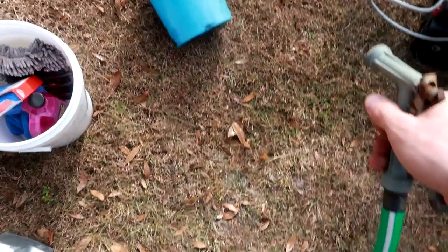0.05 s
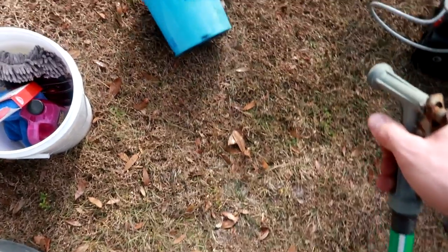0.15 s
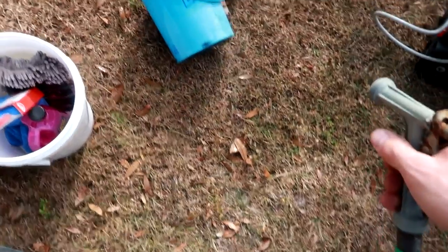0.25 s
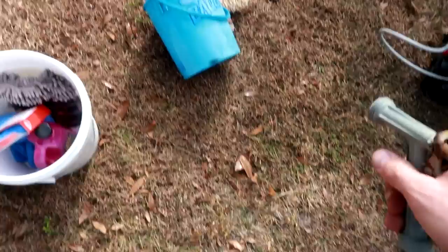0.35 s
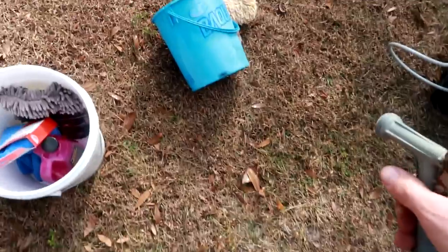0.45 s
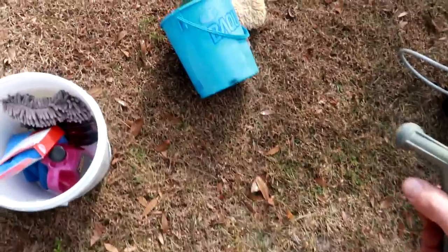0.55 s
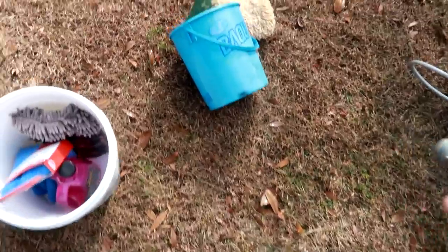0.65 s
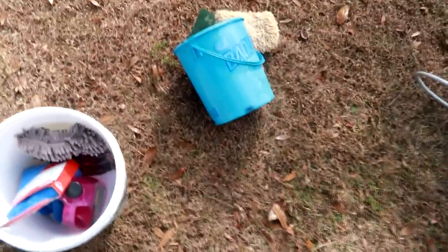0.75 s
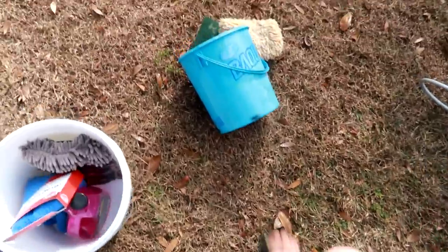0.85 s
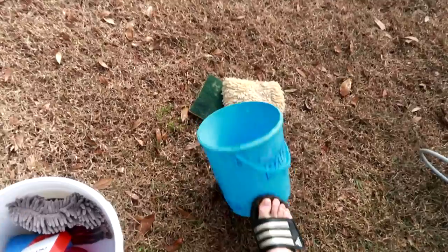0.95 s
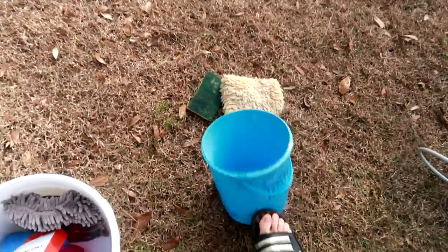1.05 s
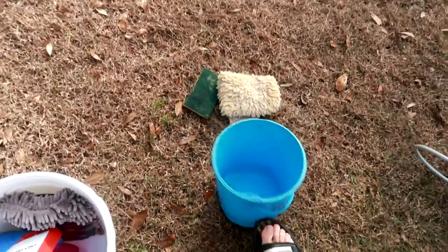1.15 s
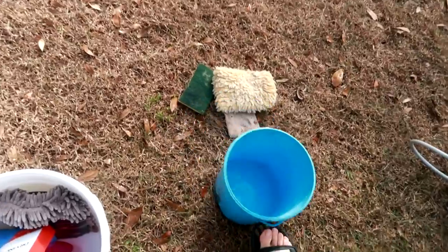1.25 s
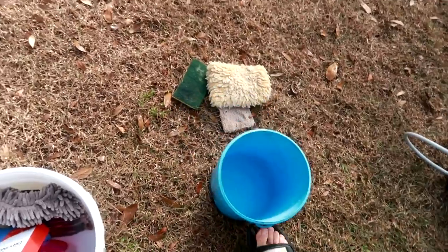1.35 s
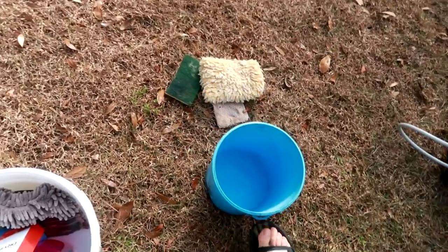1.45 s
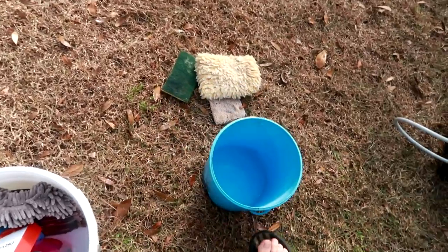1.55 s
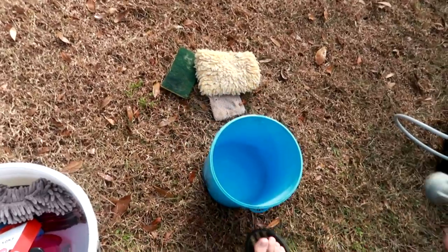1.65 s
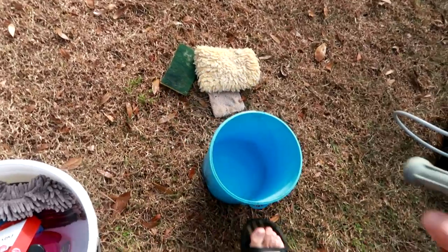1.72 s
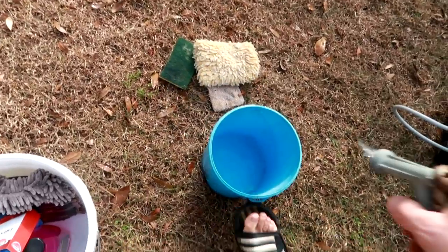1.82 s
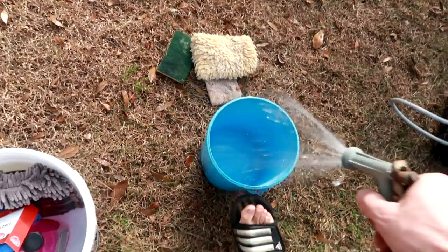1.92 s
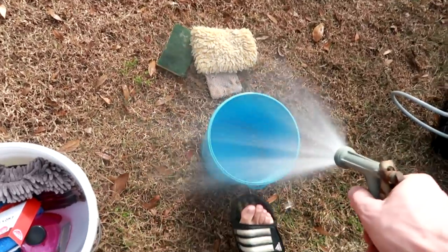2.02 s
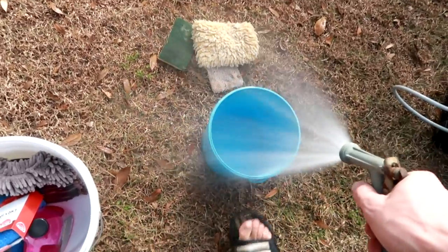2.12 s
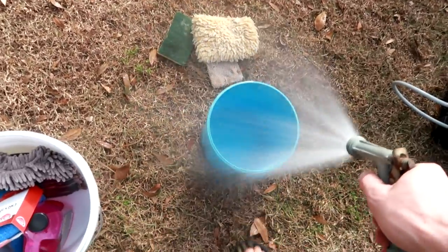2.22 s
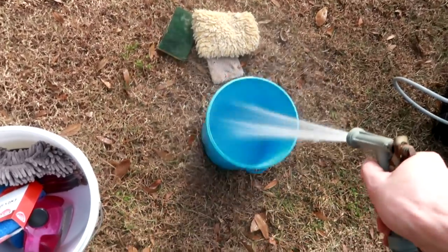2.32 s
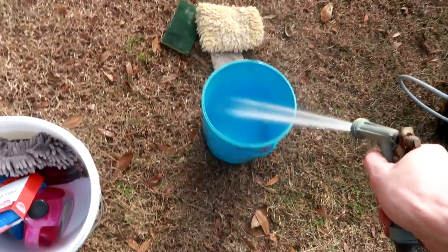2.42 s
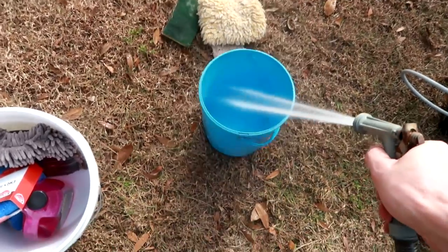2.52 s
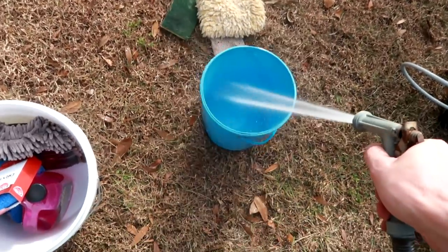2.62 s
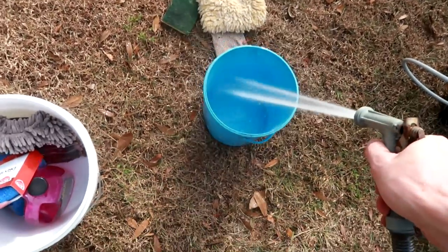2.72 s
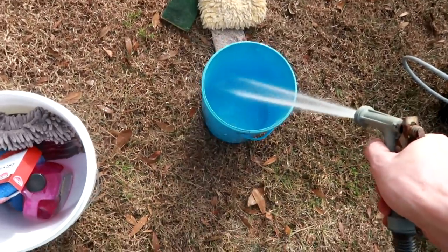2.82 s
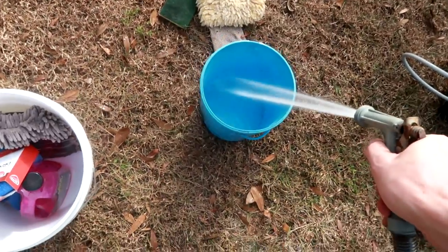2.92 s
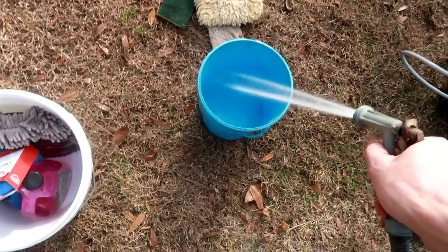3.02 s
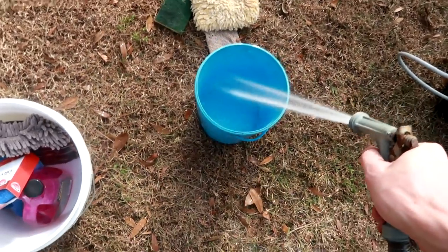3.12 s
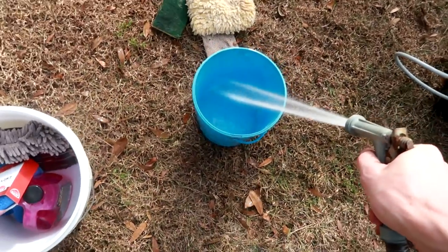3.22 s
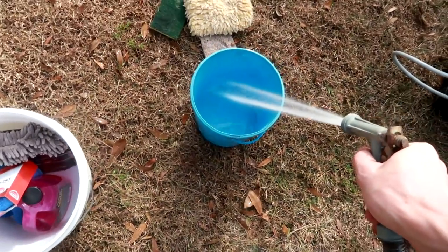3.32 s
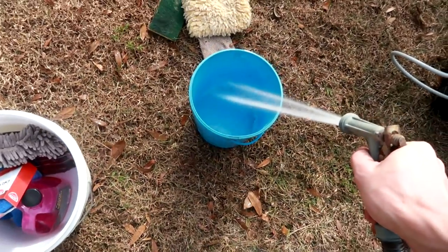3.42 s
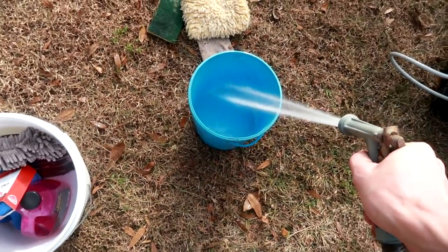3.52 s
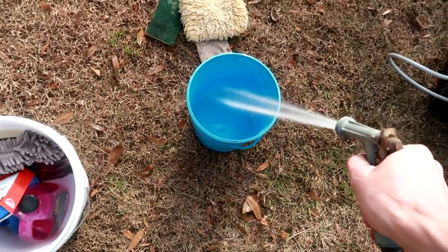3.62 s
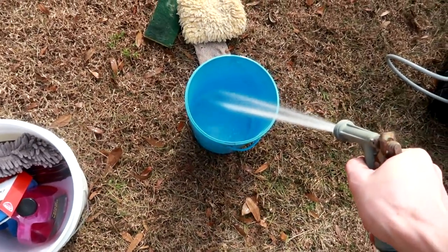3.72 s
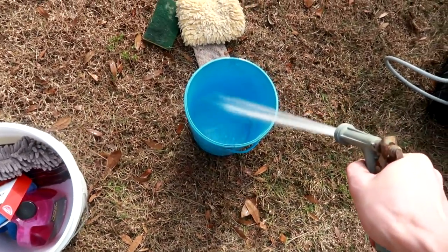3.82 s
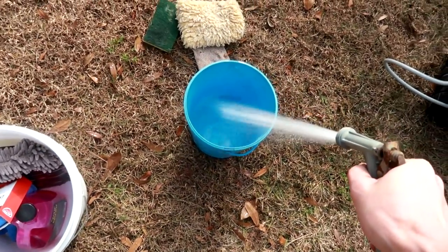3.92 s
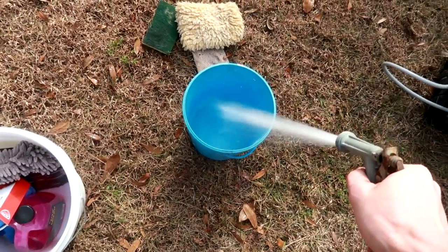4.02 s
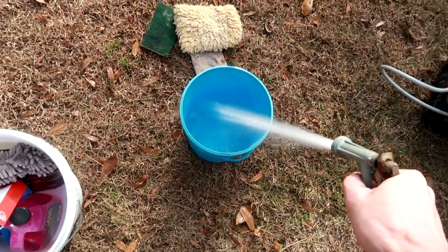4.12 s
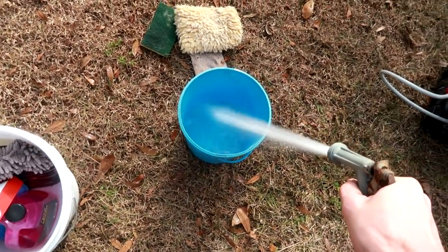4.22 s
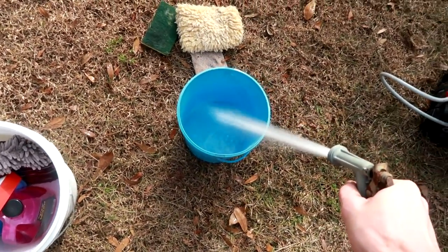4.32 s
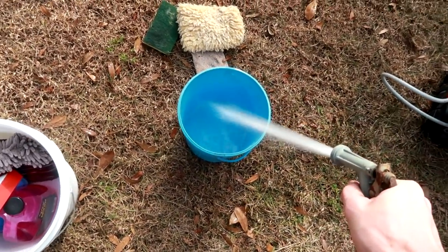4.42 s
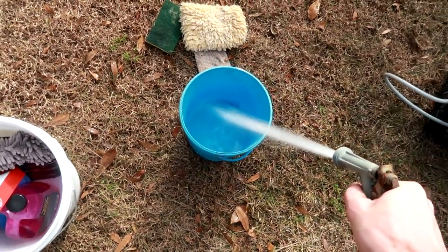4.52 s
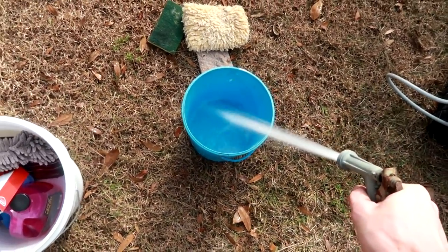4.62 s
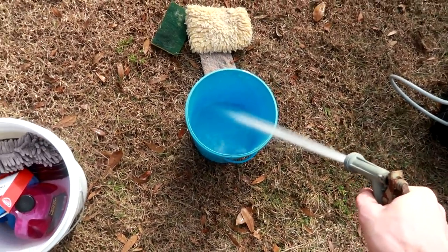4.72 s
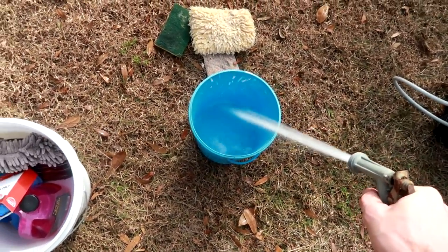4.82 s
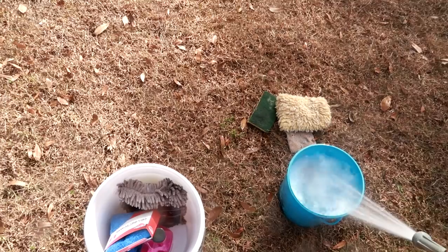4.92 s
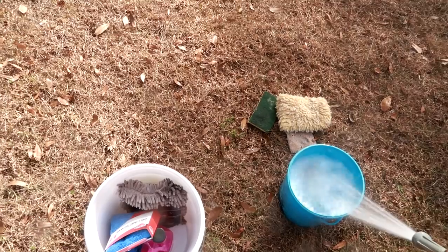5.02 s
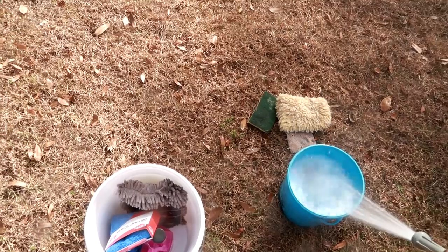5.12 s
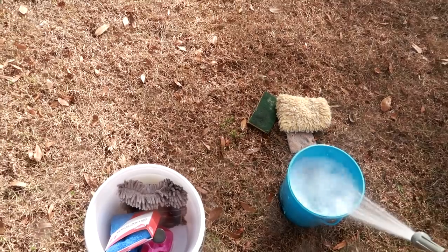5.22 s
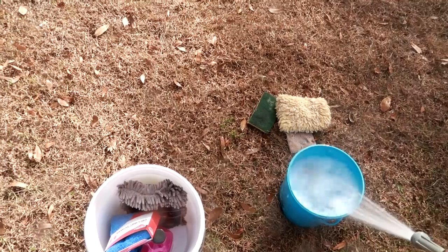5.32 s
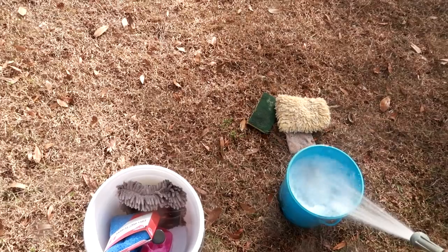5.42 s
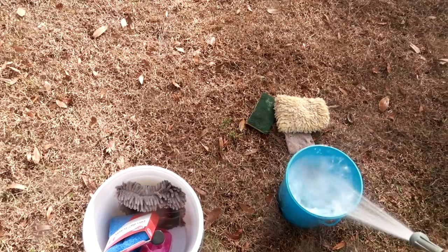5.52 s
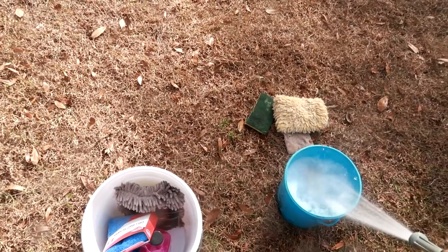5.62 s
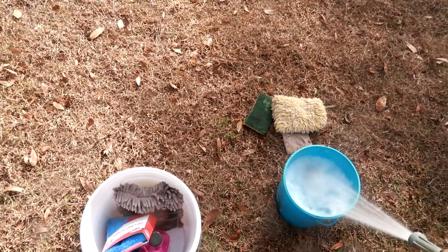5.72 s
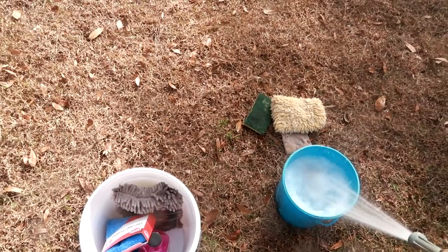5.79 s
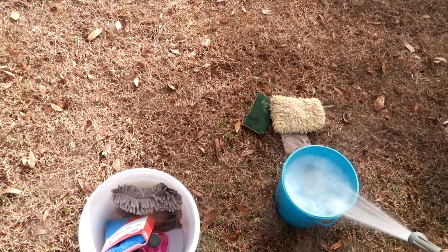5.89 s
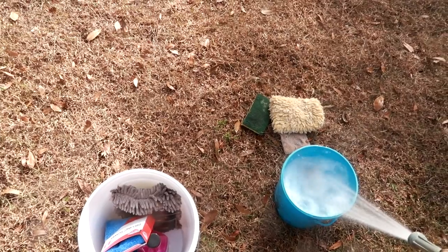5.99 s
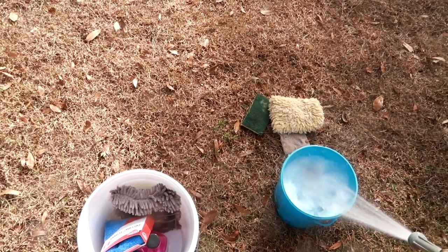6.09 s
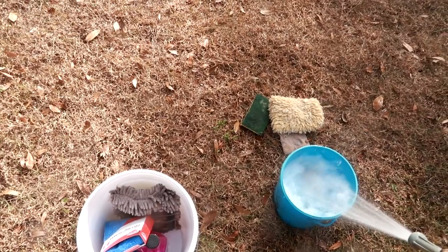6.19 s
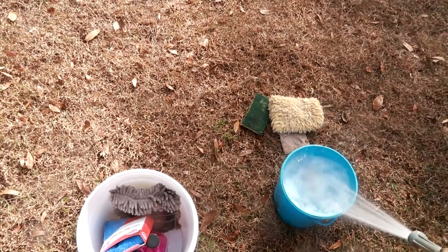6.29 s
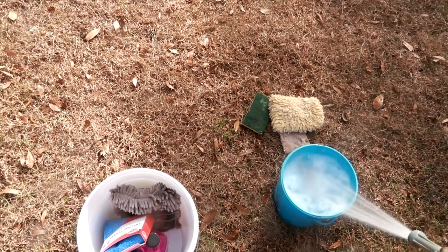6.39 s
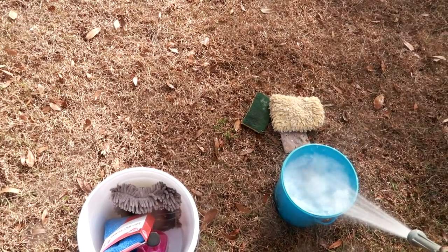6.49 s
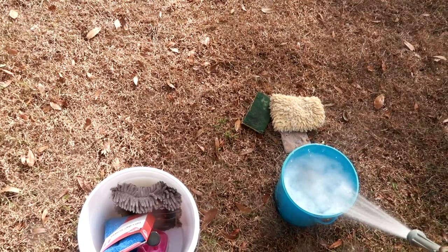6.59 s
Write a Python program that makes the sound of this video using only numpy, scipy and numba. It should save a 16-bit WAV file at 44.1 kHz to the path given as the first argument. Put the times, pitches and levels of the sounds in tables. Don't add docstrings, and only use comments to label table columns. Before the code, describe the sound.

A quiet yard murmur opens with leaf crunches, light hollow plastic taps and tiny dry insect ticks. After a lull, air hisses from a hose valve and spray patters on an empty bucket. It tightens into a loud jet, blasting the wall, ringing the air inside and thumping the base on turf. Suddenly the sound changes to even churning, gulping and fizzing in deep water, close and wide in stereo.

```python
import sys
import numpy as np
from scipy import signal
from scipy.fft import rfft, irfft
from scipy.io import wavfile
from scipy.ndimage import uniform_filter1d
from numba import njit

SR = 44100
rng = np.random.default_rng(int(sys.argv[2]) if len(sys.argv) > 2 else 0)


def materialize(psi):
    bounded = np.clip(np.atleast_2d(psi).T, -1, 1)
    quanta = np.round(bounded * 32767).astype(np.int16)
    wavfile.write(sys.argv[1], SR, quanta)


def ratio(d):
    e = np.asarray(d, float) / 20
    return 10 ** e


N = 293337
CUT_S = 4.938
HZ = np.fft.rfftfreq(N, 1 / SR) + 1e-3
TIME = np.arange(N) / SR


def rms_one(x):
    return x / np.sqrt(np.mean(x ** 2) + 1e-20)


def in_time(rows):
    s, level_db = np.transpose(rows)
    return ratio(np.interp(TIME, s, level_db, left=-140, right=-140))


def held(rows):
    s, hold, peak_db, rise, fall = np.transpose(rows)[:, :, None]
    before = np.maximum(s - TIME, 0) / np.abs(rise)
    after = np.maximum(TIME - s - hold, 0) / np.abs(fall)
    return np.sqrt(np.sum(ratio(peak_db - 20 * (before + after)) ** 2, axis=0))


def swells(rows):
    return held([(s, 0, *rest) for s, *rest in rows])


def bump_db(centre_s, height_db, half_s):
    return height_db * np.exp(-((TIME - centre_s) / half_s) ** 2)


def drift(rate_hz):
    spectrum = rfft(rng.standard_normal(N)) / (1 + (HZ / rate_hz) ** 2)
    return rms_one(irfft(spectrum * (HZ > .3), N))


def over_hz(points):
    hz, value = np.transpose(points)
    return np.interp(np.log(HZ), np.log(hz), value)


def resonances(modes):
    out = 1
    for hz, width_hz, level_db in modes:
        detune, g = hz ** 2 - HZ ** 2, ratio(level_db / 2)
        out = out * (detune + 1j * HZ * width_hz * g) / (detune + 1j * HZ * width_hz / g)
    return out


def band(low_hz, high_hz):
    b, a = signal.butter(3, [low_hz, high_hz], "band", analog=True)
    return signal.freqs(b, a, HZ)[1]


def part(spectra, low_hz, high_hz):
    x = irfft(spectra * band(low_hz, high_hz), N)
    return x / np.std(x.mean(0))


def later_part(spectra, low_hz, high_hz, shift_s=1):
    return np.roll(part(spectra, low_hz, high_hz), shift_s * SR, axis=1)


def strike(rows, response):
    s, level_db = np.transpose(rows)
    clicks = np.zeros(N)
    clicks[np.round(s * SR).astype(int)] = ratio(level_db)
    return irfft(rfft(clicks) * response, N) / np.abs(irfft(response, N)).max()


def ports(streams, alike, lead=((10, 0), (20, 0)), left=()):
    c = np.clip(over_hz(alike), 0, 1)
    skew = np.sqrt(np.abs(resonances(left))) * np.exp(.5j * over_hz(lead))
    mid, side = np.sqrt(1 + c) * streams[0], np.sqrt(1 - c) * streams[1]
    return np.array([(mid + side) * skew, (mid - side) / skew])


def air_noise():
    return rfft(rng.standard_normal((2, N)))


def droplets(per_s, spread_db, share):
    sizes = ratio(spread_db * np.minimum(rng.exponential(1, (2, N)), 5))
    sizes = sizes * rng.choice([-1, 1], (2, N))
    drops = sizes * (rng.random((2, N)) < per_s / SR) + 1e-18
    dealt = rng.integers(0, 10, (2, N))
    rings = 0
    for k, hz in enumerate(np.geomspace(350, 15000, 10)):
        r = np.exp(-np.pi * .45 * hz / SR)
        b = [(1 - r * r) / 2, 0, (r * r - 1) / 2]
        a = [1, -2 * r * np.cos(2 * np.pi * hz / SR), r * r]
        rings = rings + signal.lfilter(b, a, drops * (dealt == k))
    return rfft(np.sqrt(share) * rms_one(rings) + np.sqrt(1 - share) * rng.standard_normal((2, N)))


@njit
def moving_ring(x, cosine, r):
    y = np.zeros_like(x)
    for i in range(2, len(x)):
        y[i] = (1 - r * r) / 2 * (x[i] - x[i - 2]) + 2 * r * cosine[i] * y[i - 1] - r * r * y[i - 2]
    return y


def ring_out(x, centre_hz, width_hz):
    cosine, r = np.cos(2 * np.pi * centre_hz / SR), np.exp(-np.pi * width_hz / SR)
    return np.array([moving_ring(channel, cosine, r) for channel in x])


def emphasise(x, centre_hz, width_hz, level_db, steady=0.54):
    y = x + ratio(level_db) * ring_out(x, centre_hz, width_hz)
    power = uniform_filter1d(y.mean(0) ** 2 + 1e-9, size=SR // 25)
    y = y / power ** (steady / 2)
    return y / np.std(y.mean(0))


def yard_level():
    lull_db = bump_db(1.4, 1.5, .6)
    gust = swells([(2.44, -48, .8, .1)])
    late_s = np.maximum(TIME - 2.46, 0)
    duck_db = 9 * np.minimum(late_s / .08, 1) + 3 * late_s
    return np.hypot(ratio(-47 - lull_db - duck_db), gust) * (TIME < CUT_S)


def yard():
    # frequency in Hz, level in dB per Hz.
    murmur_tilt = [(15, -40), (25, -5.5), (118, -5), (231, -16), (293, -11), (383, -16), (588, -16),
                   (769, -20), (1000, -20.5), (1090, -22), (11200, -48), (13500, -52), (15000, -67)]
    # frequency in Hz, likeness.
    murmur_alike = [(60, 1.0), (130, 1), (290, 0.81), (640, 0.46), (1410, 0.29), (3100, 0.3), (6820, -0.34),
                    (15000, -0.052)]
    sound = ports(air_noise(), murmur_alike) * ratio(over_hz(murmur_tilt))
    murmur = yard_level() * ratio(2.5 + 1.0 * drift(5.7)) * part(sound, 32, 13000)
    whine = ratio(-82 + 4.5 * drift(40)) * np.sin(2 * np.pi * 13006 * TIME) * (TIME < 1.9)
    return murmur + whine * [[1.3], [.7]]


def leaves():
    # peak in seconds, level in dB, rise and fall in seconds per 20 dB, scuff re crackle in dB.
    footfalls = [(0.005, -50.5, .1, .1, -7), (.14, -70, .3, .3, 8), (.36, -68, .6, .11, 5),
                 (.51, -70, .14, .6, 2), (.7, -57, .18, .11, 5), (.832, -59.5, .2, .06, 1),
                 (.88, -73, .1, .5, 10), (1.2, -72, .07, .6, 9), (1.42, -76, .8, .04, 5),
                 (1.7, -83, 3, .6, 14), (1.9, -64, .05, .02, -1)]
    crackle = swells([row[:4] for row in footfalls])
    scuff = swells([(s, level_db + scuff_db, rise, fall) for s, level_db, rise, fall, scuff_db in footfalls])
    sound = ports(droplets(per_s=4500, spread_db=2.5, share=0.38), [(1000, 1.0), (8000, .3)])
    bright, dull = part(sound / np.sqrt(HZ), 2140, 10600), part(sound, 1170, 1970)
    return ratio(5.5) * crackle * bright + ratio(3.5) * scuff * dull


def knocks():
    # start in seconds, peak in dB.
    snaps = [
        (0.1552, -31),
        (0.1575, -36),
        (0.1615, -37),
        (0.1905, -41),
    ]
    # start in seconds, peak in dB, pitch in Hz, pan in dB, crack re ring in dB.
    blows = [(0.155, -31, 640, 3.5, -30), (0.16, -35, 614, 1.0, -30), (0.187, -43, 735, 1.5, -20),
             (0.509, -41, 670, -2.0, -10), (0.674, -37, 1310, 1.0, -7), (0.709, -34, 1420, 0.5, -10),
             (0.719, -32, 1430, 2.5, -10), (0.73, -39, 624, 3, -10), (0.756, -35, 1360, 0.0, -12),
             (0.798, -29, 2370, 0.5, -10), (0.805, -42, 507, -3, -10), (0.885, -40, 557, 1.0, -8),
             (1.258, -49, 622, 2.5, -10)]
    wire = resonances([(2850, 220, 17), (1800, 300, 8), (4100, 400, 8)])
    out = strike(snaps, band(1100, 11000) * wire)
    crack_colour = band(1500, 14000) * resonances([(2950, 200, 12), (7000, 600, 6)])
    for s, level_db, hz, pan_db, crack_db in blows:
        ring = strike([(s, level_db - 5.0)], band(0.86 * hz, 1.2 * hz) * resonances([(hz, 70, 14)]))
        crack = strike([(s, level_db + crack_db)], crack_colour)
        out = out + (ring + crack) * ratio(np.array([[pan_db / 2], [-pan_db / 2]]))
    return out


def insect():
    # start in seconds, peak in dB.
    ticks = [(.470, -31), (.503, -37), (.511, -29), (.569, -46), (.587, -40), (.637, -39), (.661, -45),
             (.704, -40), (.728, -40), (.770, -39), (.794, -44), (.836, -41), (.844, -46), (.860, -43),
             (.904, -39), (.931, -39), (.970, -45), (.988, -37)]
    sound = strike(ticks, band(3100, 4400) ** 2 * resonances([(4500, 300, 5), (3580, 250, 5.7)]))
    return sound * [[.72], [-1.15]]


def valve():
    # time in seconds, level in dB.
    spit = [
        (1.86, -83),
        (1.888, -63),
        (1.912, -64),
        (1.968, -41.5),
        (1.984, -48),
        (2.054, -54),
        (2.1, -45),
    ]
    # frequency in Hz, level in dB per Hz.
    spit_colour = [(2000, -20), (4000, -16), (6300, -7), (8000, -10), (10700, -2), (12500, -14),
                   (14000, -19), (15500, -41)]
    sound = ports(air_noise(), [(3000, 0.5), (12000, 0.37)]) * ratio(over_hz(spit_colour))
    return in_time(spit) * part(sound, 1500, 15000)


def jet_gains():
    # time in seconds, level in dB.
    glancing = [
        (2.05, -54),
        (2.128, -38),
        (2.236, -32.5),
        (2.4, -32),
        (2.44, -39),
        (2.67, -37),
        (2.74, -29),
        (3.3, -29),
        (4.93, -34.5),
    ]
    # time in seconds, level in dB.
    breakup = [
        (2.05, -55),
        (2.128, -35),
        (2.3, -32),
        (2.46, -28.5),
        (2.98, -28.5),
        (3.05, -31),
        (3.75, -31),
        (4.07, -38.5),
        (4.93, -38.5),
    ]
    # start in seconds, hold in seconds, level in dB, rise and fall in seconds per 20 dB.
    passes = [
        (2.468, .07, -21.5, .045, .07),
        (2.955, .11, -20, .13, .6),
        (3.2, .25, -26, .4, .6),
        (3.62, .3, -21, .6, .12),
        (3.96, .04, -20.5, .15, .3),
        (4.15, .08, -29, .3, .2),
        (4.445, .045, -19.5, .08, .11),
        (4.665, .17, -18.5, .12, .3),
        (4.9, .05, -21.5, .1, .1),
    ]
    # peak in seconds, level in dB, rise and fall in seconds per 20 dB.
    sputters = [(2.486, -26.5, .06, .08), (2.6, -30, .2, .05), (2.67, -30, .15, .1),
                (2.78, -25.5, .12, .15), (2.9, -28, .1, .25), (3.38, -30, .1, .5), (3.5, -29.5, .4, .5),
                (3.99, -36, .1, .2), (4.38, -35, .7, .3), (4.66, -32.5, .3, .25), (4.92, -33.5, .08, .1)]
    booms = [(2.2, -44, .2, 3), (2.468, -25, .06, .1), (2.56, -33, .05, .2), (2.666, -32, .12, .05),
             (2.76, -35, .07, .2), (2.93, -31, .09, .2), (3.032, -24.5, .2, .14), (3.376, -30, .09, .6),
             (3.58, -33, .4, .4), (3.71, -25.5, .2, .16), (3.986, -32, .09, .9), (4.25, -35.5, .2, .25),
             (4.48, -34, .2, .08), (4.625, -34.5, .05, .1), (4.78, -32.5, .12, 1)]
    square_hits = [
        (2.09, .02, -44, .1, .2),
        (2.62, .17, -31, .1, .1),
        (2.96, .15, -26, .1, .3),
        (3.8, .26, -28, .3, .1),
        (4.15, .3, -35, .1, .2),
        (4.64, .3, -32, .08, .1),
    ]
    impact = np.hypot(in_time([*glancing, (CUT_S, glancing[-1][1])]), held(passes))
    spray = np.hypot(in_time([*breakup, (CUT_S, breakup[-1][1])]), swells(sputters))
    spray = spray * ratio(-bump_db(4.11, 2, .05))
    hard, broken = impact / ratio(-24), spray / ratio(-30)
    air = np.hypot(ratio(-43) * hard ** .7, swells(booms))
    slap = np.hypot(ratio(-27.3) * hard ** .55 * broken ** .65, held(square_hits))
    return air, impact, slap, spray


def jet(sound):
    # time in seconds, air column in Hz, wall in Hz, slap in Hz, dead spot in Hz.
    aim = [(2.23, 312, 835, 2750, 1600), (2.53, 311, 840, 2750, 1600), (2.64, 294, 835, 2170, 1560),
           (2.76, 318, 800, 2200, 1560), (2.95, 308, 865, 2250, 1520), (3.08, 300, 835, 2300, 1500),
           (3.3, 278, 785, 2400, 1490), (3.5, 322, 830, 2500, 1510), (3.68, 310, 830, 2600, 1520),
           (3.83, 315, 865, 2600, 1530), (3.95, 288, 865, 2700, 1550), (4.15, 297, 860, 2300, 1570),
           (4.42, 278, 845, 2400, 1590), (4.5, 300, 850, 2500, 1570), (4.63, 280, 850, 2400, 1540),
           (4.94, 300, 880, 2600, 1550)]
    # width in Hz, lift in dB.
    ring_settings = [
        (21, 30),
        (115, 9),
        (600, 3),
    ]
    split_hz = [240, 410, 1520, 4500, 15500]
    parts = [part(sound, low, high) for low, high in zip(split_hz, split_hz[1:])]
    s, *centres, dead_hz = np.transpose(aim)
    for k, (hz, (width_hz, lift_db)) in enumerate(zip(centres, ring_settings)):
        parts[k] = emphasise(parts[k], np.interp(TIME, s, hz), width_hz, lift_db)
    parts[3] = emphasise(parts[3], 6200 * ratio(1.24 * drift(2.5)), 1200, -9.0, steady=.1)
    wobble_db = 1.02 * drift(13) + 0.94 * drift(76)
    follows, flicker_db = [0.54, 1.22, 0.98, 0.49], [0.29, 1.0, 0.32, 0.9]
    out = 0
    for gain, x, shared, own_db in zip(jet_gains(), parts, follows, flicker_db):
        out = out + gain * ratio(shared * wobble_db + own_db * drift(11.5)) * x
    return out - .75 * ring_out(out, np.interp(TIME, s, dead_hz), width_hz=150)


def fan(stream):
    # start in seconds, hold in seconds, level in dB, rise and fall in seconds per 20 dB.
    patter = [
        (2.16, .23, -41, .08, .04),
        (2.92, .15, -33, .1, .15),
        (3.42, .1, -36, .1, .2),
        (4.68, .1, -34, .08, .1),
    ]
    return held(patter) * later_part(stream, 480, 760)


def nozzle(sound):
    return held([(2.2, 3, -39.5, .1, .1)]) * later_part(sound, 7000, 14000)


def floor(stream):
    # peak in seconds, level in dB, rise and fall in seconds per 20 dB.
    thuds = [(2.47, -37, .5, .1), (2.78, -43, .15, .12), (2.98, -38, .2, .2), (3.1, -39.5, .4, .05),
             (3.2, -44, .1, .3), (3.45, -45, .25, .3), (3.57, -45, .1, .3), (3.74, -48, .2, .12),
             (4.12, -54, .5, .1), (4.45, -55, .2, .11), (4.81, -55, .2, .1), (4.91, -45, .03, .2)]
    tip = swells([(2.468, -36, .04, .08)])
    return swells(thuds) * part(stream, 165, 245) + tip * part(stream, 90, 190)


def sheets(stream):
    # start in seconds, hold in seconds, level in dB, rise and fall in seconds per 20 dB.
    sheet_runs = [
        (2.47, .08, -29, .04, .05),
        (3.0, .1, -33, .1, .1),
        (4.66, .25, -30, .06, .05),
    ]
    return held(sheet_runs) * later_part(stream, 1620, 2900, shift_s=2)


def slosh(stream):
    # start in seconds, hold in seconds, level in dB, rise and fall in seconds per 20 dB.
    sloshes = [
        (2.5, .05, -31, .05, .05),
        (3.3, .3, -30, .15, .15),
        (4.3, .05, -35, .1, .1),
    ]
    return held(sloshes) * later_part(stream, 940, 1380)


def first_blast(sound):
    # peak in seconds, level in dB, rise and fall in seconds per 20 dB.
    blasts = [
        (2.505, -19.5, .05, .11),
        (2.78, -30, .06, .2),
        (2.96, -26, .3, .25),
    ]
    return swells(blasts) * later_part(sound, 2660, 5200)


def rim(stream):
    # start in seconds, peak in dB.
    splats = [(2.4854, -14), (2.5826, -8), (2.638, -11), (2.7587, -8), (2.804, -6), (3.065, -14),
              (3.3694, -14), (3.6418, -13), (4.178, -20), (4.47, -18), (4.489, -18), (4.6426, -18),
              (4.6924, -19)]
    # frequency in Hz, width in Hz, level in dB.
    rim_modes = [(1280, 44, 24), (2130, 520, 14)]
    ring = part(stream * resonances(rim_modes), 1250, 2600)[:, ::-1]
    return swells([(2.675, -23.5, .35, .25)]) * ring + ratio(-2) * strike(splats, band(3500, 10000))


def empty_bucket():
    # frequency in Hz, level in dB per Hz.
    empty_tilt = [(100, -44), (200, -28.5), (420, -22), (650, -10), (1000, -12.5), (2000, -16), (4000, -20),
                  (6200, -23), (7800, -27.5), (10000, -25.5), (13000, -31), (16000, -46)]
    # frequency in Hz, width in Hz, level in dB.
    empty_modes = [(394, 68, -13.5), (1235, 130, 0.5), (1986, 160, -4.5), (2120, 100, 1), (2450, 190, -6),
                   (3130, 100, 1.5), (4030, 340, 1), (215, 60, -4), (465, 90, -3)]
    # frequency in Hz, likeness.
    empty_alike = [(300, .999), (900, .98), (1350, .93), (1540, .6), (1750, .92), (2400, .96), (3400, .98),
                   (4500, .91), (5300, .98), (6500, .91), (8500, .96), (9600, .96), (11000, .78),
                   (14600, .5)]
    # frequency in Hz, lead in rad.
    empty_lead = [(500, 0), (860, .17), (1400, .22), (1600, -.25), (2000, -.45), (3100, -.1), (4300, .08),
                  (9500, .02), (11000, .6), (14600, 1.2)]
    # frequency in Hz, width in Hz, level in dB.
    empty_left = [(930, 610, 8.5), (2150, 1000, -4)]
    stream = ports(droplets(per_s=6000, spread_db=3.5, share=0.29), empty_alike, empty_lead, empty_left)
    sound = stream * ratio(over_hz(empty_tilt)) * resonances(empty_modes)
    out = jet(sound) + fan(stream) + nozzle(sound) + floor(stream)
    out = out + sheets(stream) + slosh(stream) + first_blast(sound) + rim(stream)
    return out * (TIME < CUT_S)


def full_bucket():
    # frequency in Hz, level in dB per Hz.
    full_tilt = [(30, -16.5), (100, -8.5), (300, -9), (1000, -11.5), (2500, -10), (5000, -10),
                 (9000, -11.5), (12000, -17), (16000, -30.5)]
    # frequency in Hz, width in Hz, level in dB.
    full_modes = [(46, 16, 6), (74, 15, 8.5), (168.3, 27, 8.5), (220, 39, -3.5), (435, 150, 6),
                  (544, 34, -9.5), (660, 100, 2), (800, 150, 4.5), (1250, 200, 1), (1490, 80, -15),
                  (1740, 230, 0), (2050, 360, -8.5), (3140, 250, -3.5), (3590, 850, 3.5)]
    # frequency in Hz, likeness.
    full_alike = [(300, .9995), (1200, .995), (1460, .6), (1700, .995), (2300, .89), (2700, .84),
                  (3600, .87), (5200, .77), (9500, .73), (11000, .63), (14600, .42)]
    # frequency in Hz, lead in rad.
    full_lead = [(300, 0), (600, 0), (860, .2), (1200, 0), (1460, .3), (1600, -.1), (2670, -.45),
                 (4300, -.95), (5200, -.75), (6500, -1.15), (9500, -1.1), (11000, -.75), (14600, -2.3)]
    # frequency in Hz, width in Hz, level in dB.
    full_left = [(790, 330, 4), (2400, 700, -1.5), (3800, 2600, -2.5)]
    # peak in seconds, level in dB.
    gulps = [
        (6.249, -26),
        (6.329, -26.5),
        (6.459, -26.5),
    ]
    stream = ports(droplets(per_s=6000, spread_db=2.5, share=0.29), full_alike, full_lead, full_left)
    sound = stream * ratio(over_hz(full_tilt)) * resonances(full_modes)
    gulping = swells([(s, level_db, .07, .16) for s, level_db in gulps])
    gains = ratio(-33.5), np.hypot(ratio(-27.3), gulping), ratio(-24.5)
    split_hz, flicker_db = [36, 560, 2090, 15500], [1.2, .9, .4]
    wobble_db = .5 * drift(26)
    out = 0
    for gain, low, high, own_db in zip(gains, split_hz, split_hz[1:], flicker_db):
        out = out + gain * ratio(wobble_db + own_db * drift(7)) * part(sound, low, high)
    return out * (TIME >= CUT_S)


def scene():
    return yard() + leaves() + knocks() + insect() + valve() + empty_bucket() + full_bucket()


def roll_off(x):
    return signal.sosfilt(signal.butter(12, 15610, fs=SR, output="sos"), x)


def record(dry):
    soft = .95 * np.tanh(dry / .95)
    top_cut = signal.cheby2(10, 60, 16800, fs=SR, output="sos")
    return roll_off(signal.sosfilt(top_cut, soft))


dry = scene()
out = record(dry)
materialize(out)
```